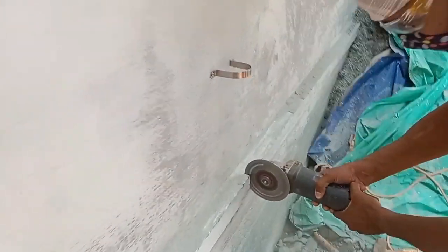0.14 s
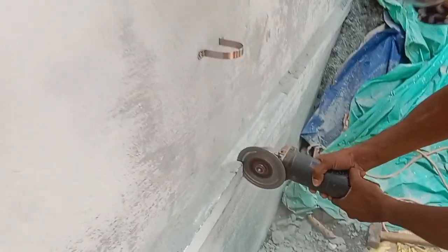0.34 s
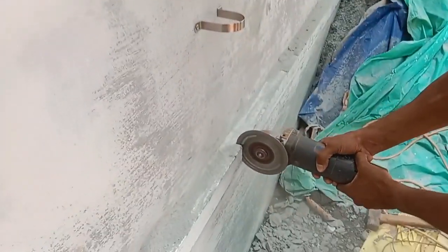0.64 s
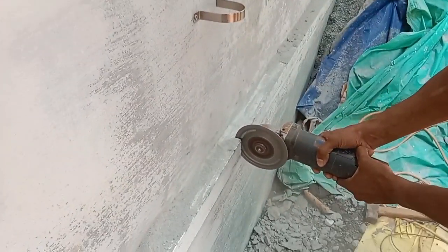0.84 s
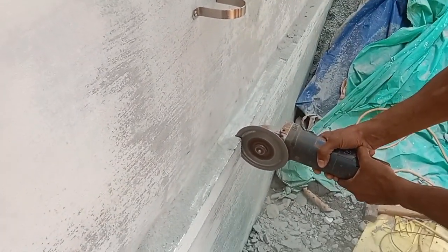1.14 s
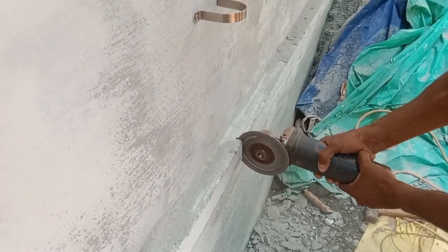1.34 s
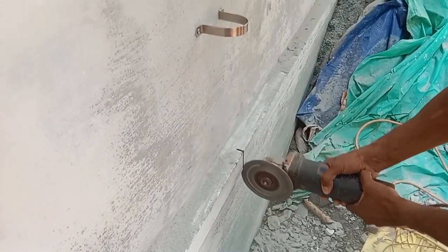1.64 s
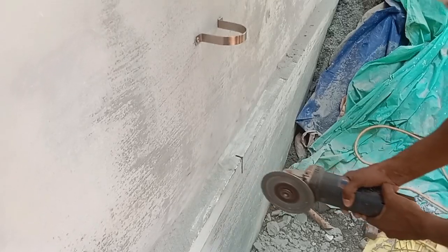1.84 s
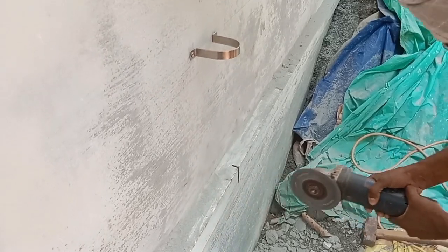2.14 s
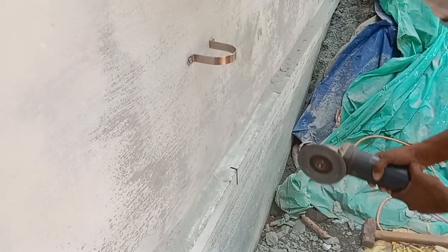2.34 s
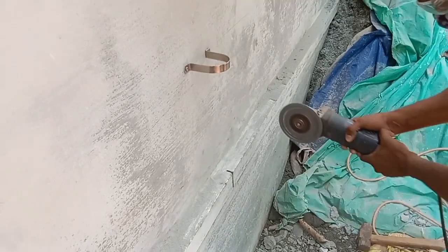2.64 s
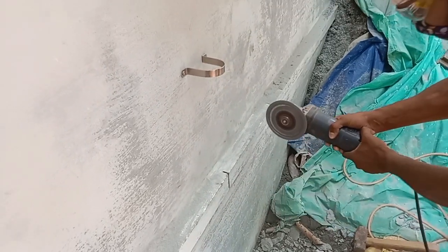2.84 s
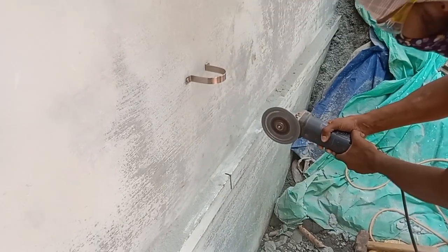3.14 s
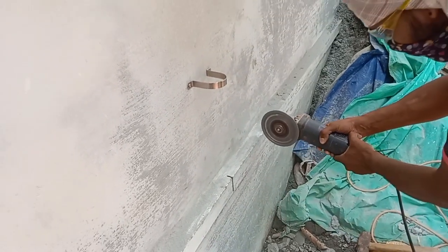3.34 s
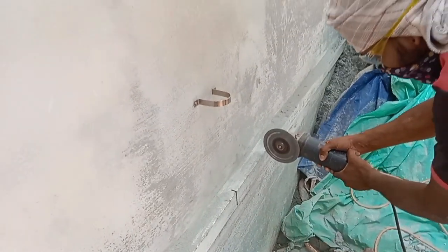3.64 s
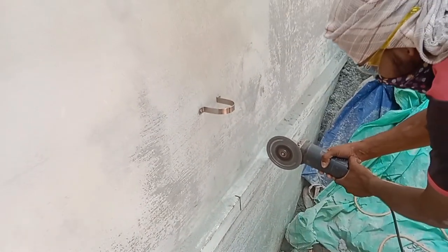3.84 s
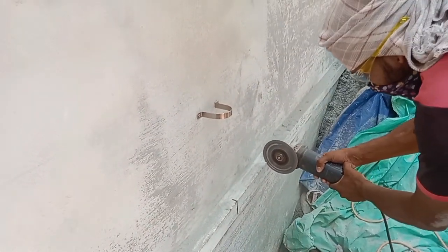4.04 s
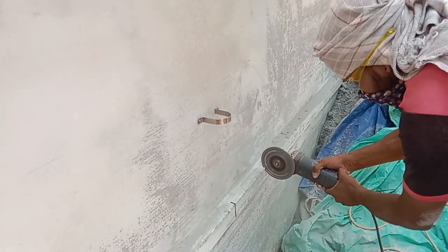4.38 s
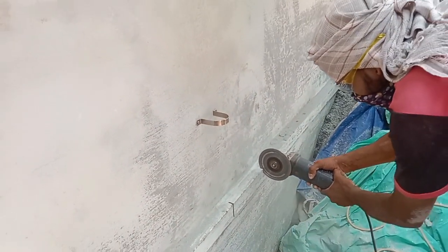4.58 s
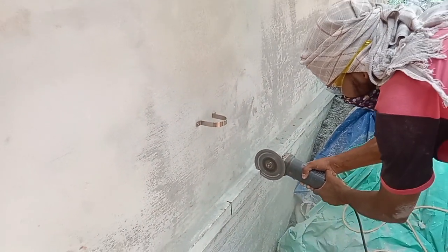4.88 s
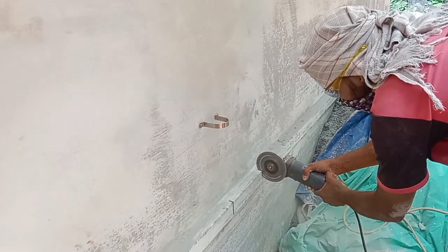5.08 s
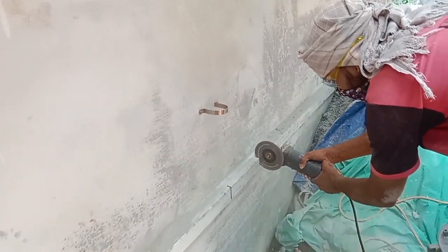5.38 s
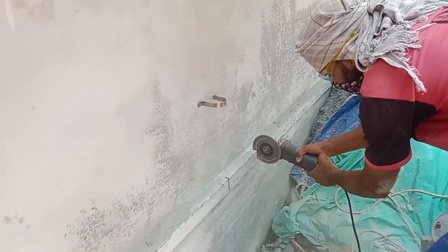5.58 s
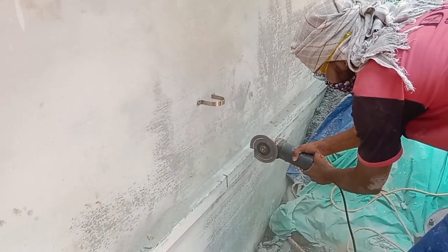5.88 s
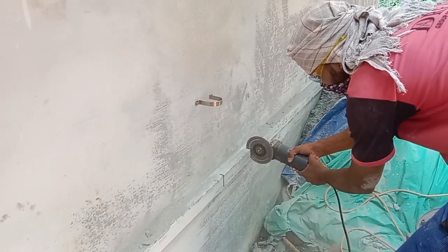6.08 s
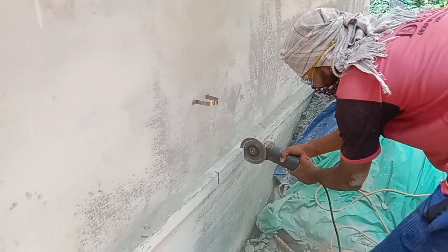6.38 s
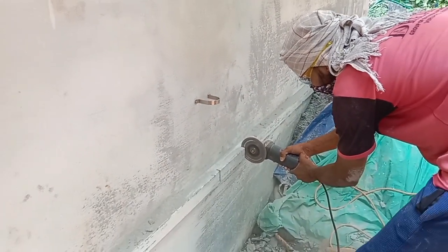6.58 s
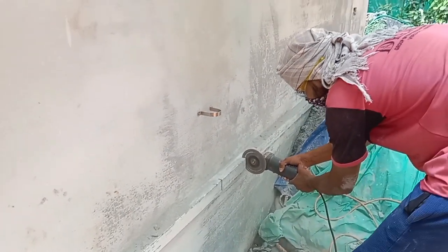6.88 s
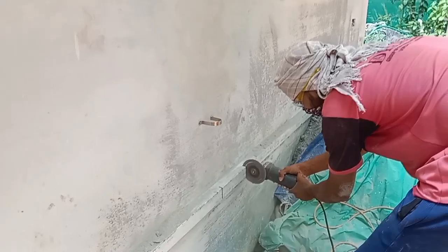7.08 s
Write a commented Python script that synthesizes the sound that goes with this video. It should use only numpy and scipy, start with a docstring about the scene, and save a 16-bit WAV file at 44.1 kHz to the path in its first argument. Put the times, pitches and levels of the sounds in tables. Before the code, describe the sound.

An angle grinder is already cutting a plastered wall outdoors, about an arm's length from the microphone. Its high gear whine and rushing fan mix with a harsh, gritty scrape, a ringing disc and tiny ticks of chips. The cut deepens around 0.5 seconds and the pitch sags, while crumbs hit the microphone with small low thumps until about 1.3 seconds. Near 1.9 seconds the disc lifts off and the scraping drops sharply. The whine rises, holding high from about 2.5 to 4 seconds. Irregular short bursts of metallic gear rattle run from roughly 1.7 to 4.7 seconds. From just under 4 seconds the disc eases back into the wall, and the scraping builds until about 5 seconds as the pitch falls. This lighter cut continues, wavering and slightly farther away, until the end at around 7 seconds.

```python
"""An angle grinder bites deep into a plastered wall, lifts off and speeds up, then is eased in again.
Outdoors, the microphone at arm's length, the tool drifting from about 0.7 m to just over 1 m away.
Grit scrapes and rings the disc, the bevel gears whine, the fan rushes; the wall reflects these.
Under light load the gears rattle in their play. During the first, deeper cut, flying crumbs of
plaster thump the microphone, and the fan's draught buffets it faintly."""
import sys
import numpy as np
from scipy import signal
from scipy.fft import rfft, irfft, next_fast_len
from scipy.io import wavfile
from scipy.ndimage import map_coordinates

SR = 44100
rng = np.random.default_rng(int(sys.argv[2]) if len(sys.argv) > 2 else 0)


def file_out(sig):
    """Save sig as 16-bit WAV at sys.argv[1]."""
    # one column per channel
    cols = np.atleast_2d(sig).T
    # limit, then scale
    lim = np.clip(cols, -1, 1)
    pcm = np.round(lim * 32767).astype(np.int16)
    wavfile.write(sys.argv[1], SR, pcm)


N = 318402

# how hard the disc bites (deep cut, lifted off, lighter cut): t/s, level/dB
BITE = [(0, -5), (.3, -3.5), (.6, 3), (1.1, 2), (1.5, -0.5), (1.8, 1), (1.91, -18), (3.5, -16),
        (3.85, -8.5), (4.6, -4.5), (5.1, -1), (5.75, -4.5), (6.05, -1.5), (6.3, -4), (6.95, -1),
        (7.22, -4.5)]
# rotor speed, sagging under load: t/s, f/Hz
ROTOR_SPEED = [(0, 490), (.5, 449), (.95, 431), (1.3, 426), (1.67, 440), (2.0, 497), (2.42, 547),
               (2.62, 558), (3.0, 555), (3.4, 561), (4.0, 551), (4.4, 527), (5.0, 473), (5.5, 450),
               (6.15, 432), (6.6, 430), (7.02, 412), (7.22, 416)]
# spectrum of grit scraping in the groove: f/Hz, level/dB
SCRAPE_SPECTRUM = [(100, -29), (400, -3), (800, 5), (1400, 10.5), (1900, -12.5), (3500, 9), (5400, 18.5),
                   (7100, 17.5), (8800, -27), (9800, 0.5), (11300, -13), (13000, -2), (14000, -3),
                   (15500, -33)]
# spectrum of a stone chip's tick: f/Hz, level/dB
CHIP_SPECTRUM = [(1000, -22), (4000, 5), (6500, 12), (8600, -2), (9800, 4.5), (11300, -13), (13000, -2),
                 (15500, -5)]
# upper modes of the cutting disc: f/Hz, width/Hz, level/dB
DISC_MODES = [(8200, 90, -13), (8920, 45, 1.5), (9550, 91, -1), (9980, 300, -5), (10640, 55, 5),
              (11600, 50, -6), (11740, 80, 3), (12530, 150, 3.5), (12960, 160, 3), (13600, 220, -3),
              (14400, 130, 2.5), (14950, 150, 1.5), (15400, 120, -7)]
# the disc's singing mode comes and goes as it shifts in the groove: t/s, level/dB
DISC_SING = [(0, -44), (.9, -33.5), (1.7, -35), (3.4, -39), (3.9, -38), (5.2, -30.5), (5.45, -44),
             (6.5, -47), (7.1, -33)]
# disc and gear-case resonances that swell the gear whine: f/Hz, width/Hz, level/dB, roughness/ratio
WHINE_RESONANCES = [(4696, 190, 0.5, 0.19), (5650, 484, 9.5, 2.62), (6163, 130, 11.5, .6)]
# modes of the gear case: f/Hz, width/Hz, level/dB
CASE_MODES = [(5830, 233, 0), (6190, 170, 5.5), (6523, 140, 3.5), (6880, 280, -3), (7250, 266, -7.5)]
# upper modes of the case, a knock's bright edge: f/Hz, width/Hz, level/dB
EDGE_MODES = [(11840, 180, -2), (12050, 450, -4.5), (13200, 400, -1), (13300, 400, -5), (14600, 250, -14)]
# jolt of the whole tool: f/Hz, width/Hz, level/dB
JOLT_MODES = [(150, 210, 0)]
# bouts of gear rattle: t/s, length/s, level/dB
RATTLE_BOUTS = [(1.658, .06, -23), (1.721, .135, -10), (2.032, .027, -8), (2.103, .009, -7.5),
                (2.205, .018, -9.5), (2.259, .036, -10), (2.329, .018, -12), (2.348, 0.13, -22),
                (2.409, .018, -12), (2.491, .018, -9), (2.567, .05, -9), (2.621, .063, -23),
                (2.689, .018, -9.5), (2.71, 0.062, -24), (2.843, .018, -10), (2.948, .018, -8.5),
                (2.976, .009, -5.5), (3.059, 0.11, -26), (3.18, .036, -8.5), (3.251, .036, -10.5),
                (3.321, 0.026, -9.5), (3.376, .009, -8), (3.417, .054, -9.5), (3.488, .018, -10.5),
                (3.662, .027, -14), (3.753, .085, -22), (3.836, .081, -9), (3.953, .033, -8.5),
                (4.002, 0.099, -15.5), (4.133, .085, -7.5), (4.226, 0.13, -20), (4.358, .108, -9.5),
                (4.522, .063, -13.5), (4.65, .1, -12.5)]
# spectrum of the fan's rush: f/Hz, level/dB
FAN_SPECTRUM = [(60, -42), (200, -23), (450, -14), (1000, -8), (1900, -7), (2500, -1), (4000, 3),
                (5400, -0.5), (6400, 3.5), (8000, 4.5), (8750, -2), (9300, -13), (11300, -15.5),
                (15500, -23)]
# modes of the motor housing: f/Hz, width/Hz, level/dB
HOUSING_MODES = [(484, 100, -10), (967, 210, -7), (1386, 350, -3), (1630, 390, -1.5), (2185, 73, 5),
                 (2440, 69, 9), (3066, 205, 6)]
# air whirled between disc and guard: t/s, f/Hz, relative level/dB
GUARD_AIR = [(0, 3810, -39), (.35, 3940, -27), (.65, 3590, -28.5), (1.5, 3724, -20), (2.15, 3666, -26),
             (2.47, 3440, -24), (2.8, 3900, -24.5), (3.15, 4278, -27.5), (3.5, 3510, -42), (4.0, 3380, -30),
             (5.4, 3600, -27.5), (7.22, 3606, -26)]
# hollow rush of the vents: t/s, relative level/dB
VENT_AIR = [(0, -34), (1.1, -43), (2.1, -41), (2.7, -52), (4.1, -41), (4.9, -38), (5.5, -51), (7.22, -52)]
# resonances of the gap between guard and wall: f/Hz, width/Hz, level/dB
GAP_MODES = [(450, 45, 0), (684, 26, 1), (1020, 70, -1)]
# the gap's hollow tones, rising as the guard nears the wall: t/s, level/dB
GAP_LEVEL = [(0, -55), (1.8, -50), (2.4, -70), (4.5, -49), (5.3, -46), (7.22, -46)]
# rotor hum at top speed: multiple of rotor speed, level/dB
HUM_HARMONICS = [(2, -46), (4, -42.5), (5, -42.5), (6, -44), (7, -44)]
# crumbs landing on the microphone: t/s, relative level/dB, f/Hz
CRUMB_HITS = [(.459, -15.5, 110), (.494, -21.5, 130), (0.671, -25, 150), (.761, -16, 130), (.882, -23, 120),
              (.941, -11, 95), (1.033, -20, 100), (1.063, -10, 115), (1.123, -19, 125), (1.292, -19.5, 131)]
# reflection off the wall as the microphone moves: t/s, delay/ms, gain/ratio
WALL_ECHO = [(0, 2.65, 0.24), (1.5, 2.25, 0.066), (2.5, 3.3, 0.21), (4.6, 3, 0.15), (5.4, 2.98, 0.14),
             (7.22, 3.05, 0.14)]
# from grinder to microphone: t/s, distance/m
DISTANCE = [(0, 0.68), (.8, 0.65), (2.2, 0.74), (3.2, 0.79), (4.4, 0.81), (5.4, 0.99), (7.22, 1.15)]

FREE_SPEED_HZ, CUT_SPEED_HZ = 575, 436  # rotor turns a second, unloaded and cutting
PINION_TEETH, CROWN_TEETH = 11, 36
MAINS_HZ = 50


def cutting(speed, bounce, ripple):
    """Grains break off the wall, hardest at each bounce; they scrape, tick and set the disc ringing."""
    bite_db = curves(BITE)[0] + 1.2 * wobble(22)  # the plaster is unevenly hard
    seated_db = -7  # beyond this bite the contact levels off
    contact_db = -10 * np.log10(1 + amp(seated_db - bite_db) ** 2)
    pressure = amp(2.4 * bounce + 1.1 * ripple + 1.8 * bounce * ripple + 1.5 * wobble(50))
    grit = unit(coloured(impacts(rate=9000, scatter_db=3), SCRAPE_SPECTRUM))
    scrape = amp(-28.5 + 0.49 * bite_db) * grit
    ring = stiffened(disc_ring(bite_db, contact_db), speed)
    return pressure * (scrape + ring) + chips(bite_db, contact_db)


def disc_ring(bite_db, contact_db):
    """Grit rings the disc: the upper modes follow the bite, the low pair and the singing the contact."""
    upper = amp(-33.5 + bite_db) * unit(rung(impacts(rate=5000, scatter_db=3.5), DISC_MODES))
    low_pair = unit(rung(impacts(rate=2500, scatter_db=5), [(4716, 195, 6.5), (4854, 230, 3)]))
    sing = band(np.full(N, 8390), width_hz=60) + amp(-17) * band(np.full(N, 14990), width_hz=130)
    return upper + amp(contact_db) * (amp(-29.5) * low_pair + amp(curves(DISC_SING)[0]) * sing)


def stiffened(ring, speed):
    """Spin stiffens the disc, so its ringing rises with speed."""
    rise = 1 + 0.04 * ((speed / CUT_SPEED_HZ) ** 2 - 1)
    return map_coordinates(ring, [np.cumsum(rise)], order=5, mode="mirror")


def chips(bite_db, contact_db):
    """A chip cracks off at once and crumbles within a few milliseconds."""
    crumble = decay(np.arange(SR // 50) / SR, t60_s=0.014)
    bursts = signal.fftconvolve(np.abs(impacts(rate=49, scatter_db=6.5)), crumble)[:N]
    ticks = unit(coloured(bursts * rng.standard_normal(N), CHIP_SPECTRUM))
    return amp(-32.5 + 0.62 * bite_db + contact_db) * ticks


def load(speed):
    """The disc bounces on every second turn; the torque ripples twice a mains cycle."""
    disc_hz = speed * PINION_TEETH / CROWN_TEETH
    bounce = np.sin(phase(disc_hz / 2))
    ripple = np.sin(phase(np.full(N, 2 * MAINS_HZ)))
    return bounce, ripple


def gear_chatter(speed, bounce, ripple):
    """The teeth chatter against the case, louder as the torque grows."""
    torque_db = 20 * np.log10((FREE_SPEED_HZ - speed) / (FREE_SPEED_HZ - CUT_SPEED_HZ))
    level_db = -23.5 + 0.25 * torque_db + 0.36 * wobble(13)
    taps = impacts(rate=1400, scatter_db=6) * amp(0.6 * bounce + 0.41 * ripple + 1.6 * bounce * ripple)
    return amp(level_db) * unit(rung(taps, CASE_MODES))


def gear_whine(speed):
    """The meshing teeth whine, loudest as the pitch sweeps through a disc or gear-case resonance."""
    mesh_hz = PINION_TEETH * speed
    line = np.sqrt(2) * np.sin(phase(mesh_hz))
    rasp = band(mesh_hz, width_hz=300)
    resonant = np.zeros(N)
    for hz, width, db, rough in WHINE_RESONANCES:
        swell = 1 / (1 + (2 * (mesh_hz - hz) / width) ** 4)
        resonant += swell * rung(line + rough * rasp, [(hz, width, db)]) / np.hypot(1, rough)
    resonant_db = -34.5 + 0.58 * curves(BITE)[0] + 2 * wobble(30)
    return amp(resonant_db) * resonant + amp(-44) * line


def gear_rattle():
    """Lightly loaded teeth knock across their play: each skid rings the case and jolts the tool."""
    gap_s, jitter_s = 0.009, 0.0008
    chance = rng.standard_normal((len(RATTLE_BOUTS), 24, 3))
    knocks = []
    for (start, length_s, db), draws in zip(RATTLE_BOUTS, chance):
        count = max(1, round(length_s / gap_s))
        for k, (late, hard, bright) in enumerate(draws[:count]):
            onset = start + k * gap_s + min(k, 1) * jitter_s * late
            balance_db = np.array([-3.5, -21 + 3 * bright, -32 + 3 * bright])  # case, edge, jolt
            knocks.append((onset, amp(db + 0.9 * hard + balance_db)))
    t = np.arange(SR // 30) / SR
    tap = signal.unit_impulse(len(t))
    bodies = np.array([rung(tap, modes) for modes in (CASE_MODES, EDGE_MODES, JOLT_MODES)])
    fade = decay(t, t60_s=0.025) * (1 - np.exp(-t / 0.00021))
    out = np.zeros(N + SR)
    for onset, gains in knocks:
        skid = rng.standard_normal((3, len(t))) * fade
        rings = signal.fftconvolve(skid, bodies, axes=1)
        rings *= np.sqrt(SR * 0.0033) / np.linalg.norm(rings, axis=1, keepdims=True)  # equal energy
        out[round(onset * SR):][:rings.shape[1]] += gains @ rings
    return out[:N]


def motor(speed, ripple):
    """Air rushes through fan, guard, vents and wall gap; brushes ring the housing; the rotor hums."""
    speed_db = 20 * np.log10(speed / CUT_SPEED_HZ)
    brush_db = -35 + 0.55 * speed_db + 2 * wobble(12) + 1.7 * ripple
    fan_db = -26 + 0.43 * speed_db + 0.57 * wobble(14)
    guard_hz, guard_db = curves(GUARD_AIR)
    fan = amp(fan_db) * unit(coloured(rng.standard_normal(N), FAN_SPECTRUM))
    brushes = amp(brush_db) * unit(rung(rng.standard_normal(N), HOUSING_MODES))
    guard = amp(guard_db - 4.5) * band(guard_hz, width_hz=850)
    vents = amp(curves(VENT_AIR)[0] - 10.5) * band(2 * speed, width_hz=130)
    gap = amp(curves(GAP_LEVEL)[0]) * unit(rung(rng.standard_normal(N), GAP_MODES))
    hum = sum(amp(db + 2.6 * wobble(5)) * tone(order * speed, rough=0.65, width_hz=50)
              for order, db in HUM_HARMONICS)
    hum *= (speed / speed.max()) ** 2.9  # falls away quickly as the rotor slows
    return fan + brushes + guard + vents + gap + hum


def crumbs():
    """Each crumb gives the microphone a tick and a low swing; dust patters in a deep, close cut."""
    t = np.arange(SR // 20) / SR
    fade = decay(t, t60_s=0.018) * (1 - np.exp(-t / 0.000072))
    thumps = np.zeros(N + SR)
    for start, db, hz in CRUMB_HITS:
        swing = np.cos(2 * np.pi * hz * t + 0.36) * fade
        thumps[round(start * SR):][:len(t)] += amp(db + 5.5) * swing
    dust = unit(rung(impacts(rate=160, scatter_db=4), [(166, 330, 0)]))
    spray_db = np.minimum(curves(BITE)[0] + 2 * spreading_db() - 3.5, 0)
    return thumps[:N] + amp(-42.5 + 4.05 * spray_db) * dust


def wall(x):
    """The wall sends back a late copy, which combs the sound differently as the microphone moves."""
    delay_ms, gain = curves(WALL_ECHO)
    echo = map_coordinates(x, [np.arange(N) - delay_ms * SR / 1000])
    return (x + gain * echo) / np.sqrt(1 + gain ** 2)


def draught(speed):
    """The fan's air buffets the microphone in gusts, more when the grinder is near and fast."""
    level_db = -77 + 1.4 * spreading_db() + 20 * np.log10(speed / CUT_SPEED_HZ) + 8 * wobble(11)
    return amp(level_db) * unit(rung(rng.standard_normal(N), [(156, 110, 0)]))


def spreading_db():
    """Level at the microphone's distance, against 1 m."""
    return -20 * np.log10(curves(DISTANCE)[0])


def amp(db):
    """Decibels to gain."""
    return 10 ** (np.asarray(db) / 20)


def unit(x):
    """Scale to rms 1."""
    return x / np.sqrt(np.mean(x ** 2) + 1e-20)


def decay(t, t60_s):
    """A fade that loses 60 dB in t60_s."""
    return amp(-60 * t / t60_s)


def curves(rows):
    """One value per sample for each column after the time."""
    times, *columns = np.transpose(rows)
    return [np.interp(np.arange(N) / SR, times, column) for column in columns]


def wobble(rate):
    """A smooth random curve, rate knots a second."""
    knots = rng.standard_normal(int(N * rate / SR) + 4)
    fine = np.linspace(0, len(knots) - 1, 10 * len(knots))
    return np.interp(np.arange(N) * rate / SR, fine, map_coordinates(knots, [fine]))


def filtered(x, response):
    """x through a complex response of frequency."""
    size = next_fast_len(len(x) + SR // 2)
    return irfft(rfft(x, size) * response(np.fft.rfftfreq(size, 1 / SR)), size)[:len(x)]


def highpass(x, edge_hz):
    """A steep low cut."""
    return filtered(x, lambda hz: hz ** 4 / (hz ** 4 + edge_hz ** 4))


def coloured(x, spectrum):
    """x shaped by points (f/Hz, level/dB) on a log axis."""
    f, db = np.transpose(spectrum)
    return filtered(x, lambda hz: amp(np.interp(np.log(hz + 1), np.log(f), db)))


def rung(x, modes):
    """x through resonances (f/Hz, width/Hz, level/dB) of alternating sign."""
    def response(f):
        f = f.astype(np.float32)
        return 1j * f * sum(float((-1) ** k * amp(db) * width) / (hz * hz - f * f + 1j * width * f)
                            for k, (hz, width, db) in enumerate(modes))
    return filtered(x, response)


def phase(hz):
    """Angle of something turning at hz."""
    return 2 * np.pi * np.cumsum(hz) / SR


def band(hz, width_hz):
    """A noise band of rms 1 whose centre can move."""
    turn = phase(hz)
    return unit(wobble(width_hz) * np.cos(turn) + wobble(width_hz) * np.sin(turn))


def impacts(rate, scatter_db):
    """Random impulses of uneven size, rate a second."""
    hits = rng.random(N) < rate / SR
    return hits * amp(scatter_db * rng.standard_normal(N)) * rng.choice([-1, 1], N)


def tone(hz, rough, width_hz):
    """A line of rms 1 with a noisy skirt."""
    return unit(np.sqrt(2) * np.sin(phase(hz)) + rough * band(hz, width_hz))


def scene():
    """The grinder at the wall, drifting away from one microphone at arm's length."""
    speed = curves(ROTOR_SPEED)[0] + 0.5 * wobble(14)
    bounce, ripple = load(speed)
    tool = motor(speed, ripple) + cutting(speed, bounce, ripple)
    tool += gear_chatter(speed, bounce, ripple) + gear_whine(speed)
    airborne = wall(highpass(amp(spreading_db()) * tool, edge_hz=194))
    on_microphone = highpass(crumbs() + draught(speed), edge_hz=39)
    return (airborne + on_microphone + highpass(gear_rattle(), edge_hz=76))[None]


def record(dry):
    """The microphone rounds off the highest peaks and keeps nothing above its band limit."""
    ceiling, top_hz = 0.85, 15550
    rounded = dry[0] / (1 + np.abs(dry[0] / ceiling) ** 6) ** (1 / 6)
    return filtered(rounded, lambda hz: hz < top_hz)[None]


dry = scene()
out = record(dry)
file_out(out)
```